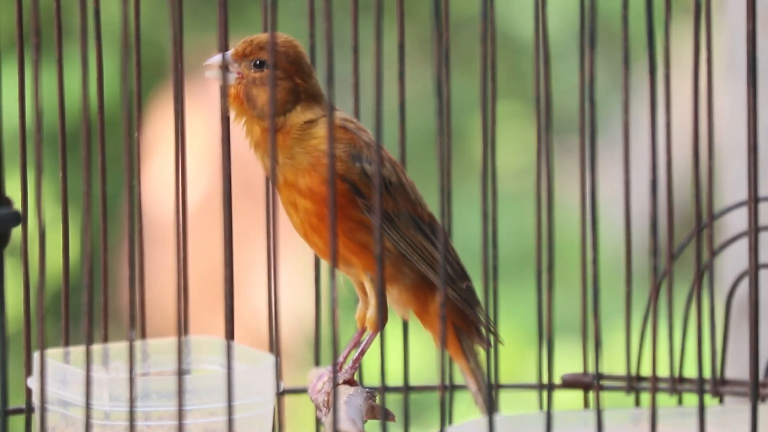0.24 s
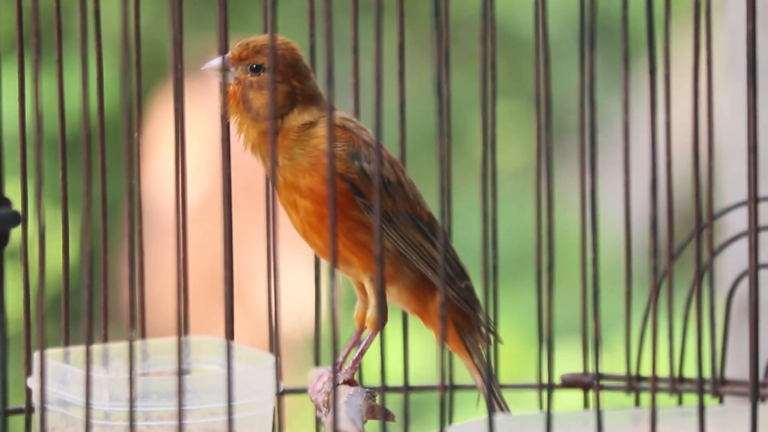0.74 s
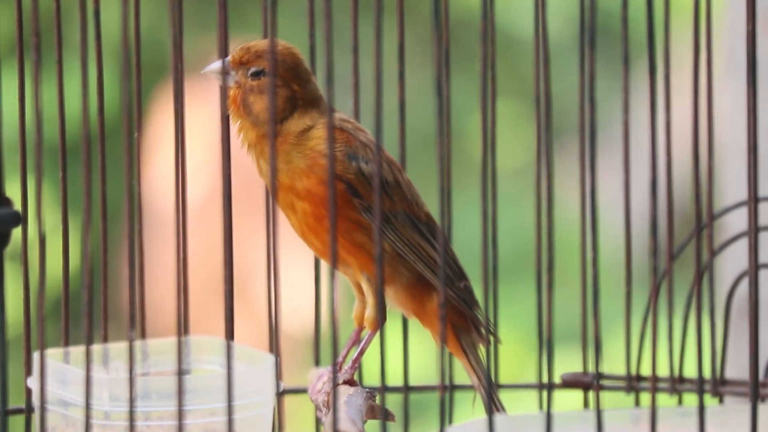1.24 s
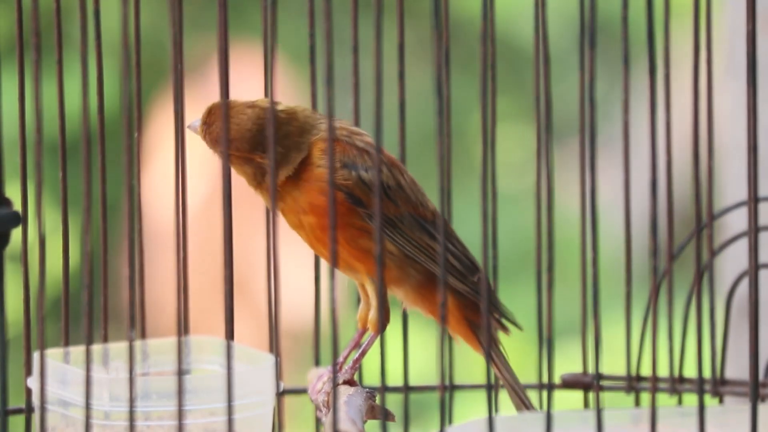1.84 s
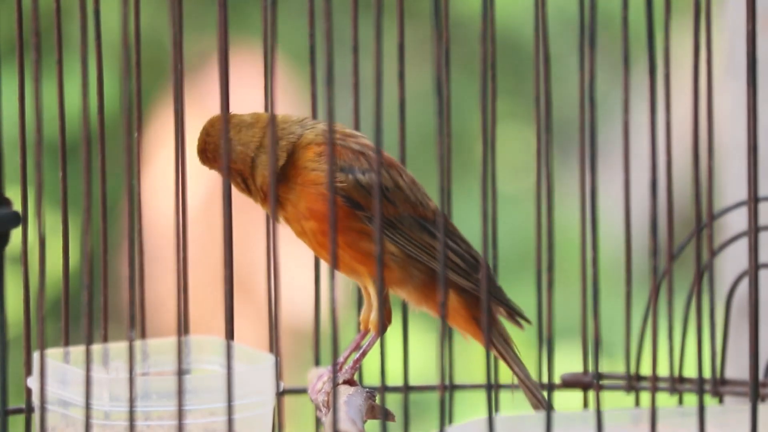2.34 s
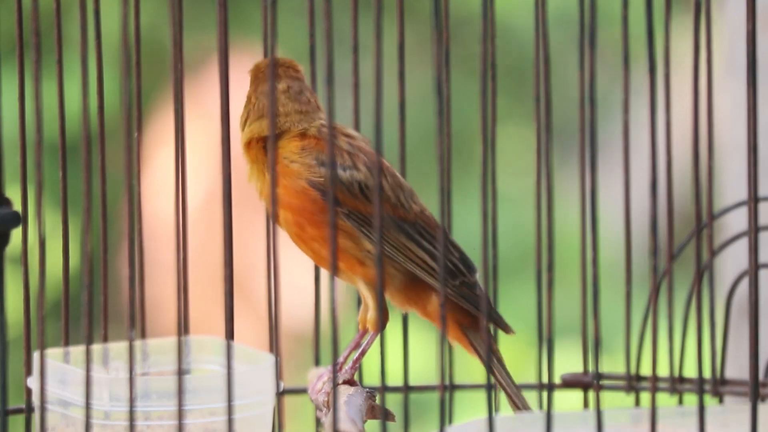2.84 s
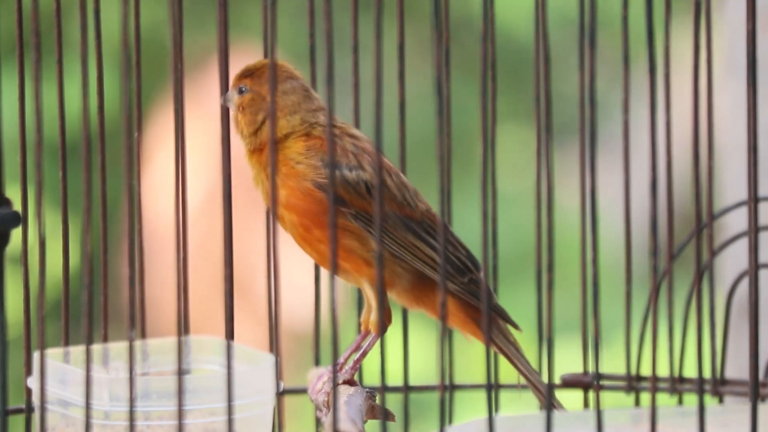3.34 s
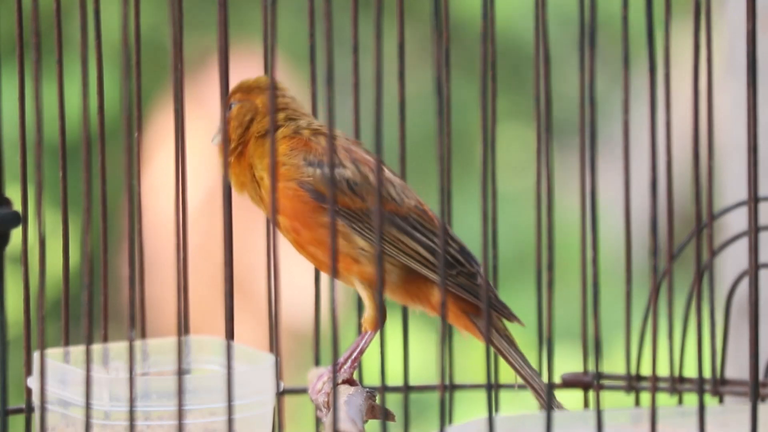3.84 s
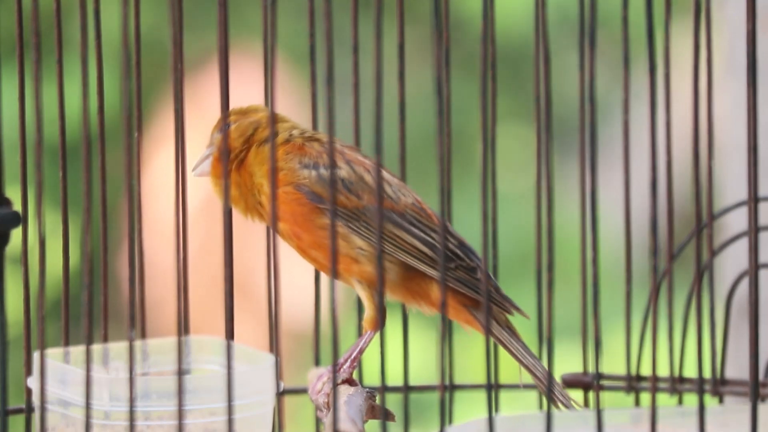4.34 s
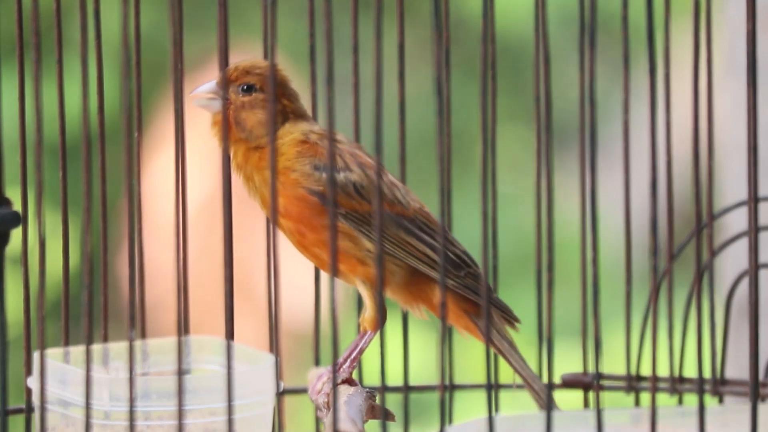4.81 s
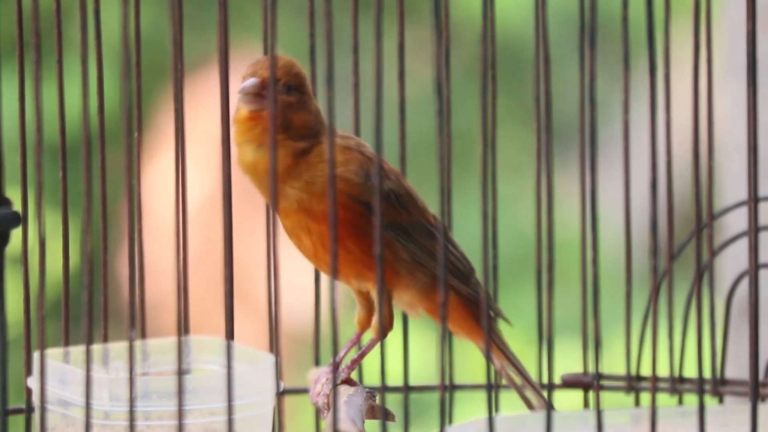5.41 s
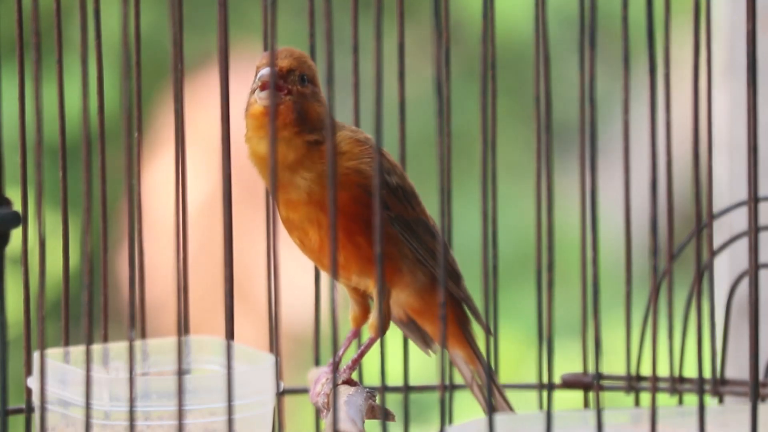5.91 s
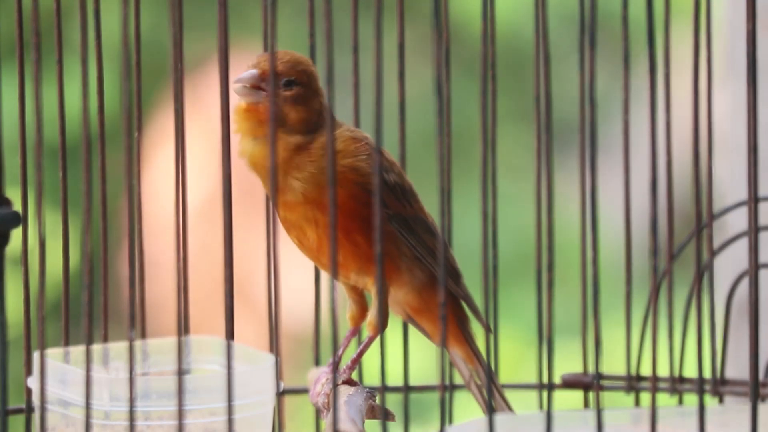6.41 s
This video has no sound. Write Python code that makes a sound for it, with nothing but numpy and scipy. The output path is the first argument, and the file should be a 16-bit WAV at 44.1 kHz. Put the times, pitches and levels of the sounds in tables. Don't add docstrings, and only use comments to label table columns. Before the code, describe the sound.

Close bright canary song: slow two-note rolls, a gap with far hoarse chirps and leaf rustle, then a machine-quick trill and more rolls.

```python
import sys
import numpy as np
from scipy import signal
from scipy.io import wavfile
from scipy.ndimage import uniform_filter1d

SR = 44100
rng = np.random.default_rng(int(sys.argv[2]) if len(sys.argv) > 2 else 0)


def convert_level_to_amplitude(level_db):
    exponent = np.asarray(level_db, float) / 20
    return 10 ** exponent


def materialize(psi):
    bounded = np.clip(np.atleast_2d(psi).T, -1, 1)
    quanta = np.round(bounded * 32767).astype(np.int16)
    wavfile.write(sys.argv[1], SR, quanta)


N = 293706
RUN_IN = 6000


def rms_one(x):
    return x / np.sqrt(np.mean(x ** 2) + 1e-20)


def at_hz(points, hz):
    table_hz, value = np.transpose(points)
    return np.interp(np.log(hz), np.log(table_hz), value)


def band(x, order, low_hz, high_hz):
    return signal.sosfilt(signal.butter(order, [low_hz, high_hz], "band", fs=SR, output="sos"), x)


def wobble(count, hz):
    lowpass = signal.butter(2, hz, fs=SR, output="sos")
    return rms_one(signal.sosfilt(lowpass, rng.standard_normal(count)))


# (frequency [Hz], level under the note [dB])
OVERTONE_RESPONSE = [(6000, -37.5), (8500, -40.5), (10500, -32.5), (12500, -28.5), (14500, -32.5),
                     (16000, -26.5)]


def add_whistle(out, rows, hoarse, overtones_db, rough):
    s, hz, db = np.transpose(rows)
    at = np.arange(round(s[0] * SR), min(round(s[-1] * SR), N))
    hz = uniform_filter1d(np.interp(at / SR, s, hz), size=31)
    level = uniform_filter1d(convert_level_to_amplitude(np.interp(at / SR, s, db)), size=37)
    level = level * signal.windows.tukey(len(at), .2)
    phase = 2 * np.pi * np.cumsum(hz) / SR
    tone = np.sin(phase) * (1 - hoarse + hoarse * rough[at])
    for k, overtone_db in enumerate(overtones_db, 2):
        gain = convert_level_to_amplitude(at_hz(OVERTONE_RESPONSE, k * hz) + overtone_db)
        gain = gain * np.clip((17000 - k * hz) / 800, 0, 1)
        rough_part = .85 + .55 * rough[at - k * 999]
        tone += gain * np.sin(k * phase) * rough_part
    out[at + len(out) - N] += level * tone


RISE_FROM_HZ, RISE_S, ARCH_HZ = 5000, .0095, 7030
NOTE_SPREAD, GLIDE_SPREAD_DB = 0.00556, 3
CREEP_HZ_PER_S, DEEPEN_HZ_PER_S, STEEPEN_PER_S = 124, 280, 0.54
FILL_DB_PER_S, RISE_FADE_DB_PER_S = 1.5, 2


def roll(row, start_s, arch_s, upper_hz, middle_db, shoulder_db, lower_hz, swell_ms, fall, drop_hz, drive):
    loud, db, s, low_db, top_db = row
    driven_s = drive * (s - start_s)
    detune = 1 + NOTE_SPREAD * rng.standard_normal()
    hz = detune * (upper_hz + CREEP_HZ_PER_S * driven_s)
    low_hz = detune * (lower_hz + CREEP_HZ_PER_S * driven_s)
    middle_db = middle_db + FILL_DB_PER_S * driven_s
    middle_db = middle_db + GLIDE_SPREAD_DB * np.sin(rng.uniform(0, 2 * np.pi))
    drop_hz = drop_hz + DEEPEN_HZ_PER_S * driven_s
    fall = fall * (1 + STEEPEN_PER_S * driven_s)
    rise_db = top_db - RISE_FADE_DB_PER_S * driven_s
    top, arch_drop, swell = loud - arch_s, ARCH_HZ - hz, swell_ms / 1000
    fall_hz = fall * swell_ms
    upper = [(top - RISE_S, RISE_FROM_HZ, rise_db - 1),
             (top - .006, ARCH_HZ - 450, rise_db),
             (top, ARCH_HZ, top_db),
             (top + .12 * arch_s, ARCH_HZ - 130, top_db - 5.5),
             (top + 0.52 * arch_s, hz + .51 * arch_drop, top_db + middle_db + 2.0),
             (top + 0.77 * arch_s, hz + 0.22 * arch_drop, db + shoulder_db),
             (loud, hz, db),
             (loud + 0.0022, hz - 110, db - 2.5),
             (loud + 0.0037, hz - 200, db - 31)]
    lower = [(s - swell - .003, low_hz + 0.45 * fall_hz + 60, low_db - 34.0),
             (s - swell, low_hz + 0.48 * fall_hz, low_db - 12.5),
             (s - .45 * swell, low_hz + .4 * fall_hz, low_db - 2.0),
             (s, low_hz, low_db),
             (s + 0.0028, low_hz - 0.36 * drop_hz, low_db - 4.0),
             (s + 0.0042, low_hz - 0.68 * drop_hz, low_db - 9),
             (s + 0.0099, low_hz - 0.28 * drop_hz, low_db - 34)]
    return upper, lower


ORDER_DB = [14.5, 11.5, 5.5]
# (upper note loudest [s], its level [dB], lower note loudest [s], its level [dB], arch level [dB])
SLOW_ROLLS = [(-0.0285, -11.5, -0.005, -10.5, -30), (0.0905, -10.5, 0.113, -10.5, -30),
              (0.2113, -12, 0.2325, -10.5, -31), (0.329, -11, 0.3495, -10, -30),
              (0.4492, -11, 0.4712, -10.5, -30), (0.5695, -11, 0.593, -11, -29.5)]
CLOSING_ROLL = [(0.695, -11.5, 0.7198, -12.5, -26.5)]
FAST_ROLLS = [(4.6015, -17.5, 4.625, -17.5, -40.5), (4.686, -16.5, 4.7043, -15, -35),
              (4.7662, -14.5, 4.7876, -14.5, -35), (4.8484, -14.5, 4.8671, -14, -36.5),
              (4.9298, -15.5, 4.9508, -14.5, -33.5), (5.0115, -15.5, 5.0328, -14.5, -34),
              (5.0924, -16.5, 5.1128, -15.5, -36.5), (5.1744, -17, 5.1933, -14, -37),
              (5.254, -18, 5.273, -13.5, -35.5), (5.332, -19.5, 5.3496, -13, -35),
              (5.411, -19, 5.4308, -14, -35), (5.493, -19.5, 5.508, -14, -34.5),
              (5.5707, -20.5, 5.5848, -15, -33), (5.6418, -20.5, 5.6618, -13.5, -34.5),
              (5.723, -18.5, 5.739, -14, -32), (5.799, -23, 5.8089, -13, -31.5)]
BRIDGE_ROLL = [(5.864, -28, 5.8813, -14.5, -24.5)]
RETURN_ROLLS = [(5.9666, -18.5, 5.991, -13.5, -35), (6.0846, -16.5, 6.1095, -12.5, -32),
                (6.2013, -15, 6.2273, -13, -32.5), (6.3212, -14.5, 6.3442, -12, -29),
                (6.439, -14.5, 6.4624, -10.5, -30), (6.5546, -12.5, 6.583, -12, -33.5),
                (6.673, -11, 6.7, 0, -33)]
SLOW = dict(arch_s=.0505, upper_hz=4440, middle_db=.2, shoulder_db=-7.5,
            lower_hz=3290, swell_ms=10.5, fall=56, drop_hz=880, drive=0)
CLOSING = dict(arch_s=.0505, upper_hz=4370, middle_db=-3.5, shoulder_db=-4,
               lower_hz=3400, swell_ms=20.5, fall=53, drop_hz=480, drive=0)
FAST = dict(arch_s=.0275, upper_hz=4695, middle_db=-3, shoulder_db=-4.5,
            lower_hz=3860, swell_ms=7.2, fall=38, drop_hz=556, drive=0.75)
BRIDGE = dict(arch_s=.015, upper_hz=5500, middle_db=-14, shoulder_db=-10,
              lower_hz=4360, swell_ms=5.2, fall=110, drop_hz=600, drive=0)
RETURN = dict(arch_s=.0495, upper_hz=4465, middle_db=-0.5, shoulder_db=-9,
              lower_hz=3244, swell_ms=9.25, fall=81, drop_hz=823, drive=0)
# (time [s], overtone level [dB])
FACING = [
    (0.7, -4),
    (4.6, -3.5),
    (5.2, -1.5),
    (5.6, 1),
]
ROLL_ROUGHNESS = .07


def add_rolls(out, rough):
    phrases = [(SLOW_ROLLS, SLOW), (RETURN_ROLLS, RETURN), (FAST_ROLLS, FAST),
               (CLOSING_ROLL, CLOSING), (BRIDGE_ROLL, BRIDGE)]
    for rows, shape in phrases:
        for row in rows:
            upper, lower = roll(row, rows[0][0], **shape)
            overtones_db = np.array(ORDER_DB) + np.interp(row[0], *np.transpose(FACING))
            add_whistle(out, upper, ROLL_ROUGHNESS, overtones_db, rough)
            if lower[0][0] < N / SR:
                add_whistle(out, lower, ROLL_ROUGHNESS, overtones_db - 4, rough)


TRILL = [3.6193, 3.6476, 3.679, 3.7088, 3.74, 3.7714, 3.8024, 3.835, 3.8656, 3.897, 3.9298, 3.963, 3.9956,
         4.0275, 4.0586, 4.0912, 4.1247, 4.1571, 4.189, 4.2222, 4.2547, 4.2892, 4.3222, 4.3549, 4.3895,
         4.4246, 4.4612, 4.4978]
# (time [s], pitch [Hz], level [dB])
EFFORT = [
    (3.62, 3860, -26.5),
    (3.689, 4167, -19.5),
    (3.85, 4220, -16.5),
    (4.1, 4264, -16),
    (4.3, 4328, -15.5),
    (4.42, 4540, -16),
    (4.5, 4710, -16),
]
CHIP_RISE_HZ, CHIP_NARROW_HZ_PER_S, CHIP_OVER_HZ = 1220, 825, 110
CHIP_HOLD_S_PER_S = 0.0014
CHIP_THIRD_DB = -14
BREATH_DB, BREATH_HZ = -32, 2350


def add_trill(out, rough):
    at, pitch_hz, level_db = np.transpose(EFFORT)
    for s in TRILL:
        hz, db = np.interp(s, at, pitch_hz), np.interp(s, at, level_db)
        rise = CHIP_RISE_HZ - CHIP_NARROW_HZ_PER_S * (s - TRILL[0])
        over = CHIP_OVER_HZ * rise / CHIP_RISE_HZ
        hold = CHIP_HOLD_S_PER_S * (s - TRILL[0])
        breath_db, third_db = db + BREATH_DB, 2 * db + CHIP_THIRD_DB
        rough_part = [(s - .017, hz + BREATH_HZ, breath_db + 7),
                      (s - .013, hz + 0.72 * BREATH_HZ, breath_db),
                      (s - .008, hz + 0.23 * BREATH_HZ, breath_db + 15.5),
                      (s - .005, hz + 400, breath_db)]
        chip = [(s - .0035, hz - rise, db - 33),
                (s - .0015, hz - .5 * rise, db - 5),
                (s, hz - 0.073 * rise, db - .6),
                (s + 0.0029 + hold, hz + 1.46 * over, db - 8.0),
                (s + 0.00384 + hold, hz + 1.3 * over, db - 23)]
        third = [(s - .001, 3 * hz - 200, third_db - 5),
                 (s + 0.00088, 3 * hz + 100, third_db),
                 (s + 0.0036, 3 * hz + 150, third_db - 10),
                 (s + 0.027, 3 * hz, third_db - 11)]
        chip_overtones_db = np.array(ORDER_DB) + db + [4, 3, 11]
        add_whistle(out, rough_part, .7, [], rough)
        add_whistle(out, chip, .04, chip_overtones_db, rough)
        add_whistle(out, third, .6, [], rough)


SNAP_DB, SNAP_S, SNAP_LOW_HZ, SNAP_TOP_HZ = -28.5, 0.0028, 4800, 13500


def throat_snaps():
    out, t = np.zeros(RUN_IN + N), np.arange(300) / SR
    puff = np.e * t / SNAP_S * np.exp(-t / SNAP_S)
    at, _, level_db = np.transpose(EFFORT)
    for s, db in zip(TRILL, np.interp(TRILL, at, level_db)):
        i = RUN_IN + round((s - SNAP_S) * SR)
        out[i:i + len(t)] += convert_level_to_amplitude(db + SNAP_DB) * rng.standard_normal(len(t)) * puff
    return band(out, 2, SNAP_LOW_HZ, SNAP_TOP_HZ)


# (time [s], pitch [Hz], level [dB])
LEAD_IN = [
    [(3.408, 3400, -56), (3.416, 3570, -37), (3.425, 3640, -38), (3.43, 3444, -51)],
    [(3.44, 3830, -56), (3.452, 3930, -50), (3.465, 4480, -42), (3.477, 4620, -29.5), (3.488, 4580, -57),
     (3.495, 4600, -87)],
]


def canary():
    out, rough = np.zeros(RUN_IN + N), wobble(N, hz=544)
    add_rolls(out, rough)
    add_trill(out, rough)
    out += throat_snaps()
    for rows in LEAD_IN:
        add_whistle(out, rows, .05, [14, -6], rough)
    small_beak = signal.butter(6, 2250, "high", fs=SR, output="sos")
    return signal.sosfilt(small_beak, out)


def tails(x, parts):
    t = np.arange(SR // 2) / SR
    onset = np.clip(t / 0.0011, 0, 1)
    shape = 0
    for db, t60 in parts:
        decay = onset * convert_level_to_amplitude(-60 * t / t60)
        shape = shape + convert_level_to_amplitude(db) * decay / np.sqrt(np.sum(decay ** 2))
    noise = rng.standard_normal((2, len(t)))
    return signal.fftconvolve(x[None], shape * noise, axes=1)[:, :len(x)]


# (time [s], left-right difference [dB])
HEAD = [(0.0, -5.5), (0.85, -3), (3.3, -3), (3.41, 8.5), (3.67, -4), (4.43, 0), (4.64, -2.5), (5.75, -5),
        (6.66, -2.5)]
# (delay [ms], left level [dB], right level [dB])
ECHOES = [(2.8, -6, -10), (6.1, -17, -14), (8.2, -16, -20), (10.6, -15, -17), (12.3, -18, -16),
          (14.6, -17, -21), (21.3, -23, -21)]
RIGHT_LAG = 2
PORCH_DB, PORCH_T60_S, YARD_DB, YARD_T60_S = -7, 0.13, -17, .38


def porch(x):
    s, pan_db = np.transpose(HEAD)
    half_db = np.interp((np.arange(len(x)) - RUN_IN) / SR, s, pan_db) / 2
    out = np.array([x * convert_level_to_amplitude(half_db), np.roll(x, RIGHT_LAG) * convert_level_to_amplitude(-half_db)])
    for ms, left_db, right_db in ECHOES:
        for ear, db in enumerate((left_db, right_db)):
            lag = round(ms * SR / 1000) + rng.integers(-4, 5)
            out[ear, lag:] += convert_level_to_amplitude(db) * x[:-lag]
    out += tails(x, [(PORCH_DB, PORCH_T60_S), (YARD_DB, YARD_T60_S)])
    return out[:, RUN_IN:]


# (time [s], length [s], start pitch [Hz], end pitch [Hz], level [dB])
SPARROWS = [(1.358, 0.043, 3980, 2815, -44), (1.462, 0.033, 4250, 2836, -41.5),
            (1.689, 0.039, 4790, 2890, -43), (1.735, 0.021, 6250, 8370, -37),
            (1.755, 0.04, 6650, 5680, -42), (1.763, 0.03, 6420, 3560, -40),
            (1.837, 0.0087, 2670, 2000, -41.5), (1.864, 0.05, 4580, 2830, -42),
            (2.036, 0.061, 4850, 2780, -42.5), (2.288, 0.041, 4950, 2816, -39.5),
            (2.798, .05, 4150, 2470, -45), (2.977, 0.058, 4810, 2780, -43), (3.136, 0.055, 4830, 2836, -41),
            (3.335, 0.055, 4830, 2880, -43.5), (3.535, 0.064, 5580, 2970, -40),
            (0.831, 0.066, 5280, 5630, -45.5), (0.878, 0.031, 6430, 5920, -53),
            (0.987, 0.033, 4400, 4120, -56.5), (3.415, 0.053, 5500, 6060, -51.5)]
# (delay [ms], level [dB])
HOUSE_ECHOES = [
    (22, -3),
    (41, -6.5),
]
HOARSE, HOARSE_PER_OCTAVE = 0.27, 0.31
SPARROW_DIRECT_DB, SPARROW_NEAR_T60_S, SPARROW_FAR_T60_S = -26.5, 0.13, 0.37


def sparrows():
    out, rough = np.zeros(N), wobble(N, hz=280)
    for s, length, from_hz, to_hz, db in SPARROWS:
        octaves = abs(np.log2(from_hz / to_hz))
        hoarse = np.clip(HOARSE + HOARSE_PER_OCTAVE * octaves, 0, 1)
        chirp = [(s - .007, from_hz, db - 12),
                 (s + .1 * length, from_hz, db),
                 (s + .25 * length, .55 * from_hz + .45 * to_hz, db + 1),
                 (s + .6 * length, to_hz, db - 4),
                 (s + .72 * length, to_hz, db - 20)]
        add_whistle(out, chirp, hoarse, [], rough)
    out = out + sum(convert_level_to_amplitude(db) * np.roll(out, round(ms * SR / 1000)) for ms, db in HOUSE_ECHOES)
    reverb = tails(out, [(-3, SPARROW_NEAR_T60_S), (-8.5, SPARROW_FAR_T60_S)])
    return convert_level_to_amplitude(SPARROW_DIRECT_DB) * out + reverb


# (time [s], length [s], centre [Hz], level [dB])
RUSTLES = [
    (1.622, 0.21, 1800, -62.5),
    (1.625, 0.025, 8000, -67),
    (1.839, 0.11, 1190, -61),
    (2.226, 0.088, 7000, -60.5),
    (2.81, .05, 7960, -65),
    (2.906, 0.095, 6000, -63.5),
    (2.932, 0.064, 1220, -62.5),
    (4.044, 0.21, 1680, -56.5),
    (4.595, 0.13, 750, -55),
]


def rustles():
    out, t = np.zeros((2, N)), np.arange(SR // 4) / SR
    for s, length, hz, db in RUSTLES:
        crackle = rng.standard_normal(len(t)) * convert_level_to_amplitude(0.86 * rng.standard_normal(len(t)))
        grain = crackle + .5 * rng.standard_normal((2, len(t)))
        puff = band(grain, 2, hz / 4.6, min(hz * 2.16, 18000))
        swell = np.clip(t / 0.0034, 0, 1) * np.exp(-(t / length) ** 2)
        i = round(s * SR)
        out[:, i:i + len(t)] += convert_level_to_amplitude(db) * rms_one(puff) * swell
    return out


# (time [s], pitch [Hz], rms level [dB])
DOVE = [
    (4.38, 395, -69),
    (4.452, 405, -72),
    (4.6, 514, -65),
    (4.726, 538, -57.5),
    (4.8, 555, -70.5),
    (4.95, 528, -64.5),
    (5.0, 520, -79),
]


def dove():
    s, hz, db = np.transpose(DOVE)
    t = np.arange(N) / SR
    level_db = np.interp(t, s, db, left=-140, right=-140) + 1.5 + 3 * wobble(N, hz=14)
    return convert_level_to_amplitude(level_db) * np.sin(2 * np.pi * np.cumsum(np.interp(t, s, hz)) / SR)


# (peak time [s], half-width [s], pitch [Hz], level [dB])
HUM_SWELLS = [(0.1, .5, 211, -67), (1.4, .35, 212, -63.5), (1.4, 0.13, 250, -67), (2.1, 0.5, 148.3, -64.5),
              (2.9, .5, 148, -67), (2.75, .2, 176, -72), (3.45, 0.16, 176, -72.5),
              (4.5, 0.87, 118.6, -68.5), (5.6, 0.16, 118.6, -66), (5.55, 0.4, 146, -68),
              (6.3, 0.53, 230, -71.5)]


def idling_engine():
    out, t = np.zeros(N), np.arange(N) / SR
    for s, width, hz, db in HUM_SWELLS:
        waver_db, waver_hz = 3 * wobble(N, hz=5), 2.5 * wobble(N, hz=6)
        swell = convert_level_to_amplitude(db - 1.5 + waver_db) * np.exp(-((t - s) / width) ** 2)
        out += swell * np.sin(2 * np.pi * np.cumsum(hz + waver_hz) / SR)
    return out


# (frequency [Hz], level per Hz [dB])
AIR = [(20, -70.5), (70, -8), (200, -4), (320, -10.5), (530, -9), (800, -13), (6740, -21.5), (16000, -23.5)]
# (frequency [Hz], likeness [0-1])
LIKENESS = [(60, 0.68), (180, 0.92), (550, 0.4), (1650, 0.53), (4970, .62), (15000, .1)]
AIR_DB = -62.5


def town_air():
    out, edges = 0, 22 * 2 ** np.arange(0, 9.6, .5)
    white = rng.standard_normal((2, 2, N))
    for k, (low, high) in enumerate(zip(edges, edges[1:])):
        mid, side = band(white[k % 2], 2, low, high)
        hz = np.sqrt(low * high)
        alike = np.clip(at_hz(LIKENESS, hz), -1, 1)
        flicker_db = (1 + 2 * (hz < 2000)) * wobble(N, hz=9)
        gain = convert_level_to_amplitude(at_hz(AIR, hz) + flicker_db)
        out = out + gain * (np.sqrt(1 + alike) * mid + np.sqrt(1 - alike) * side * [[1], [-1]])
    return convert_level_to_amplitude(AIR_DB) * rms_one(out)


WIND_DB = -86.5


def wind():
    own = [wobble(N, hz=55) * convert_level_to_amplitude(4.2 * wobble(N, hz=3)) for ear in range(2)]
    shared = 1.2 * wobble(N, hz=44.4)
    return convert_level_to_amplitude(WIND_DB) * (np.array(own) + shared)


def scene():
    song = convert_level_to_amplitude(-0.5) * porch(canary())
    far_birds = sparrows() + dove()
    return song + far_birds + rustles() + idling_engine() + town_air() + wind()


def top_cut(x):
    return signal.sosfilt(signal.butter(12, 16730, fs=SR, output="sos"), x)


# (low edge [Hz], high edge [Hz], readiness)
DROPOUTS = [(550, 850, .1), (850, 1200, 1.2), (1200, 1550, .4), (1550, 1950, .8), (1950, 2400, .1),
            (7900, 8700, .3), (8700, 9600, .1), (12500, 13400, .1)]


def record(dry):
    loud_db = 10 * np.log10(uniform_filter1d(np.mean(dry ** 2, axis=0), size=6000) + 1e-12)
    demand = np.clip((loud_db + 29.5) / 4, -4, .55)
    edge = 1 - signal.windows.tukey(N, .012)
    mix = dry
    for low, high, ready in DROPOUTS:
        patches = demand - 4 * edge + ready - 1 + .7 * wobble(N, hz=12)
        shut = np.clip(2 * patches, 0, .95)
        weak = signal.butter(3, [low * .95, high * 1.05], "band", fs=SR, output="sos")
        mix = mix - shut * signal.sosfiltfilt(weak, mix)
    mix = signal.sosfilt(signal.cheby2(12, 50, 16300, fs=SR, output="sos"), mix)
    return top_cut(mix)


dry = scene()
out = record(dry)
materialize(out)
```